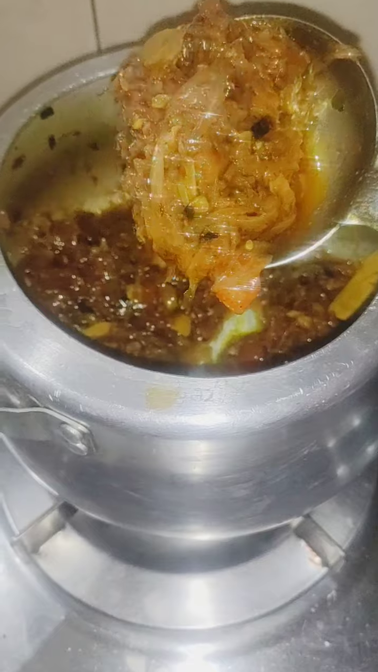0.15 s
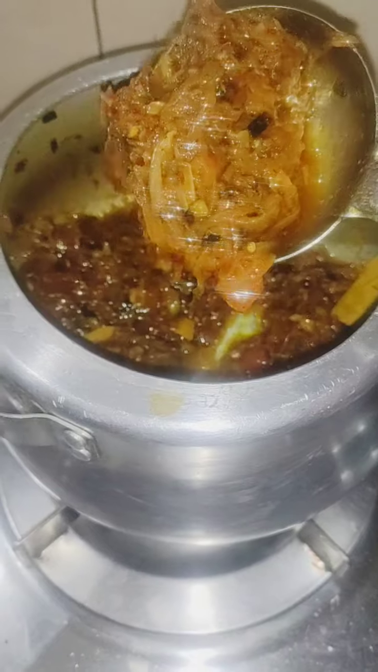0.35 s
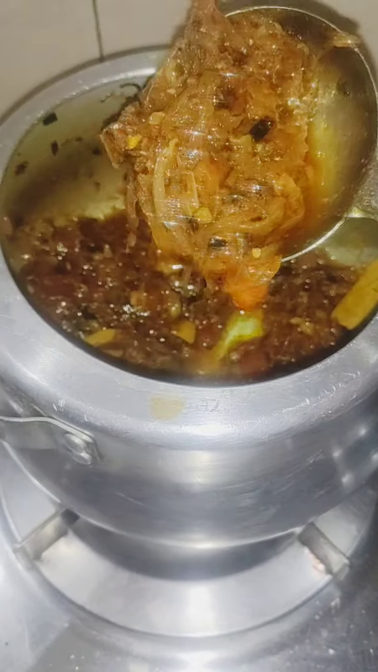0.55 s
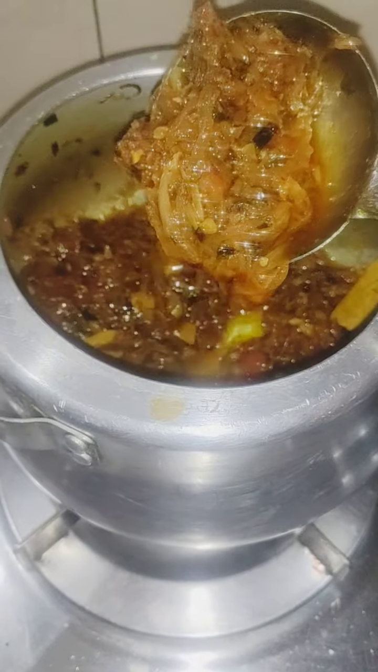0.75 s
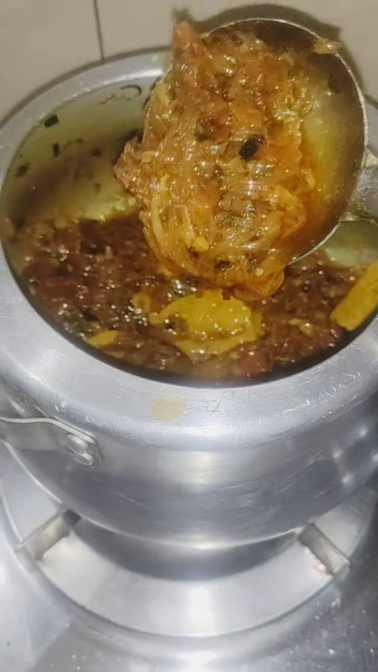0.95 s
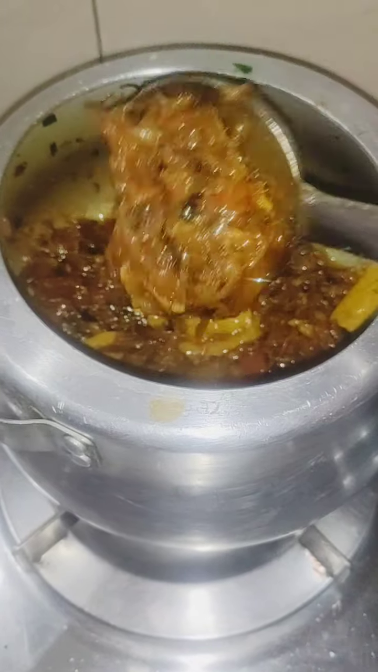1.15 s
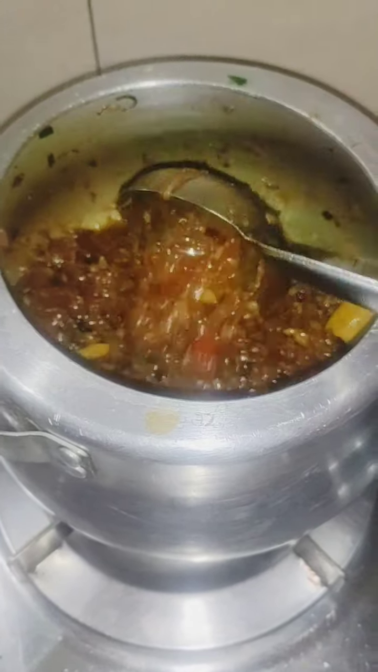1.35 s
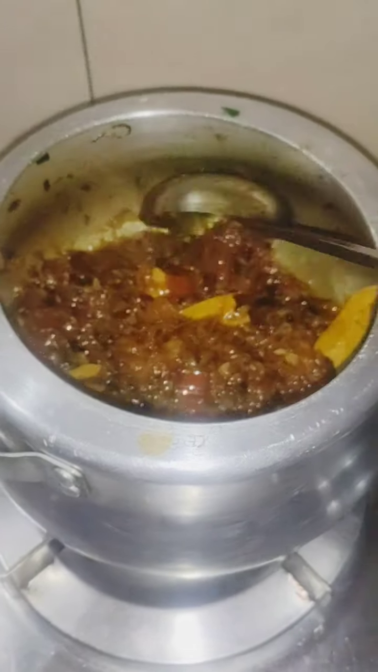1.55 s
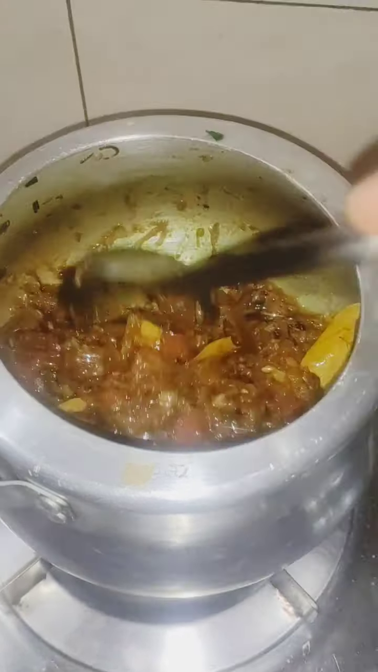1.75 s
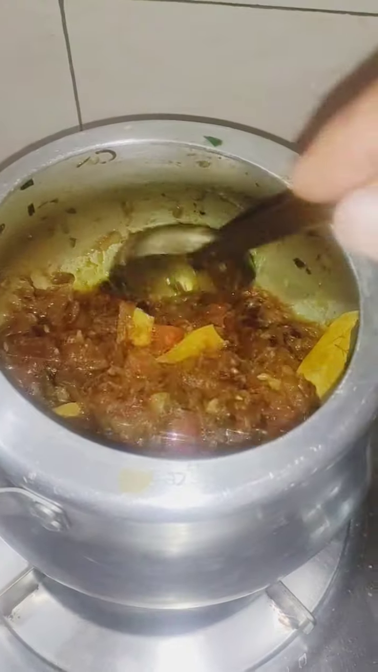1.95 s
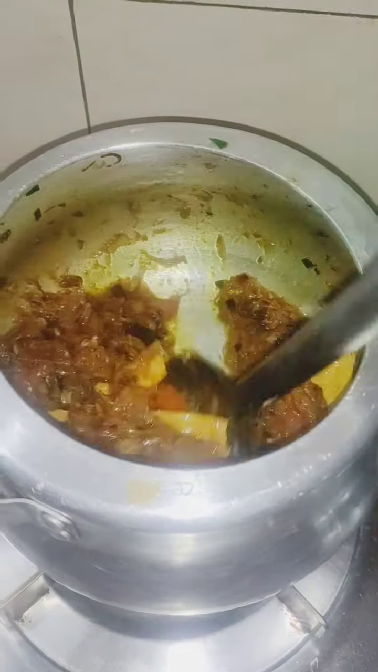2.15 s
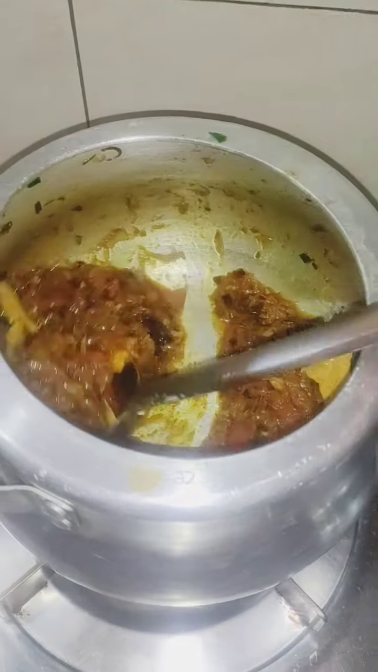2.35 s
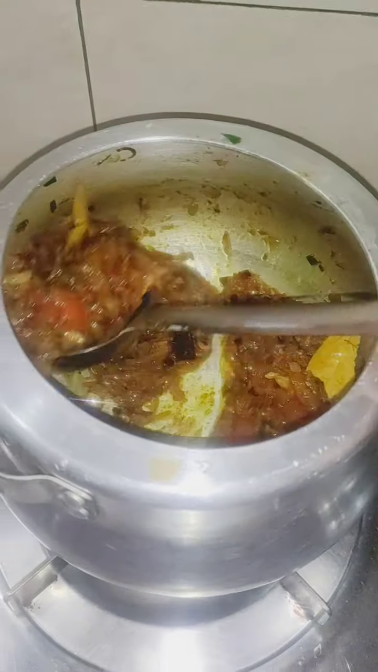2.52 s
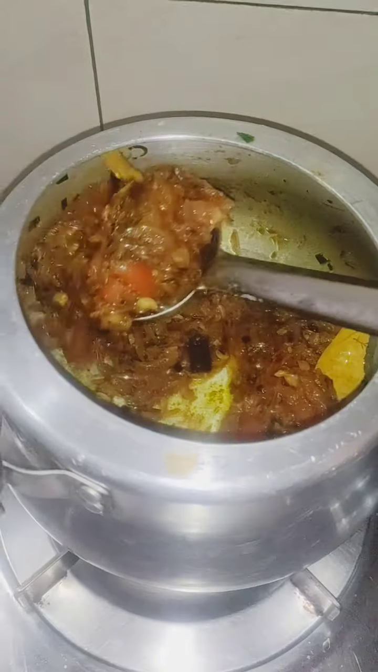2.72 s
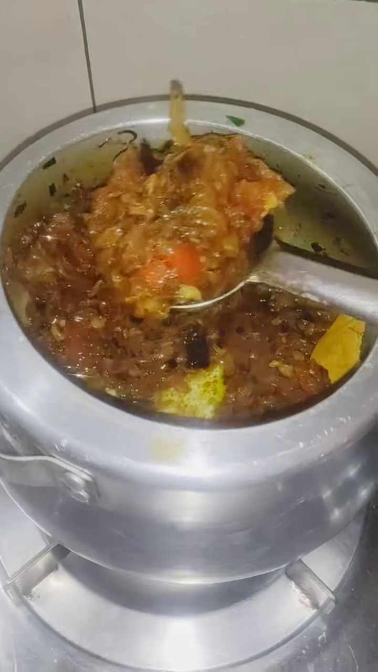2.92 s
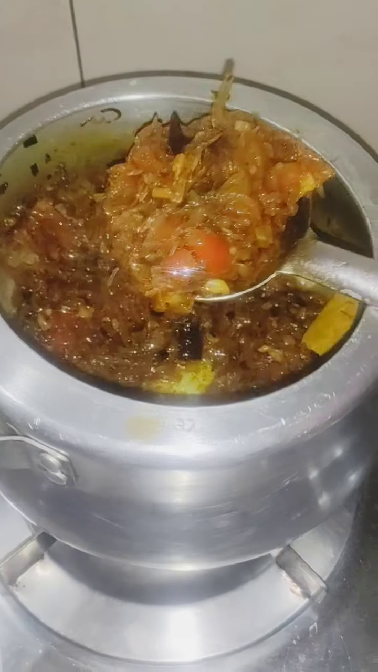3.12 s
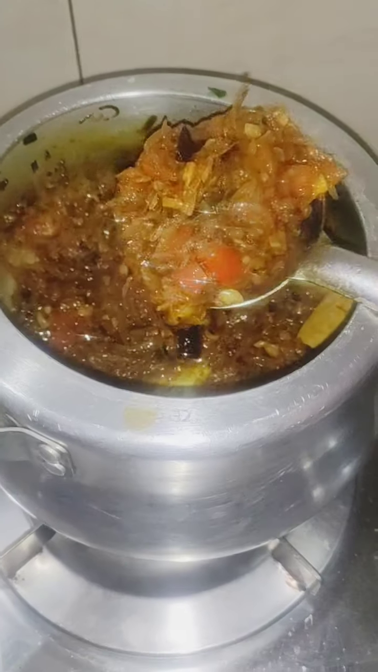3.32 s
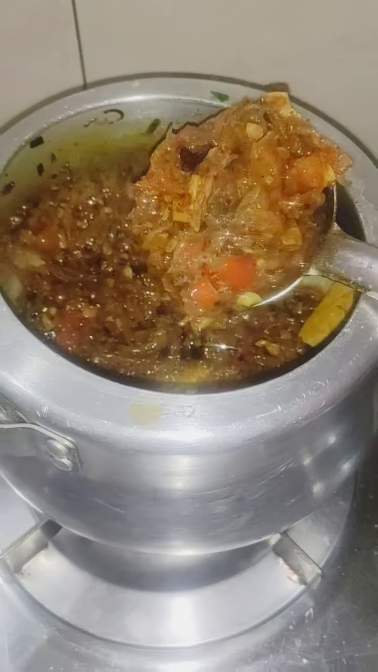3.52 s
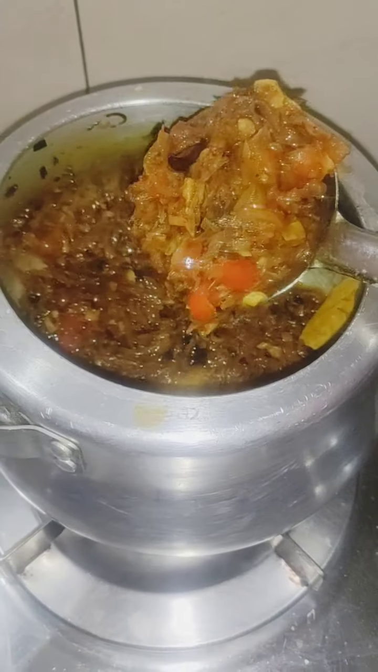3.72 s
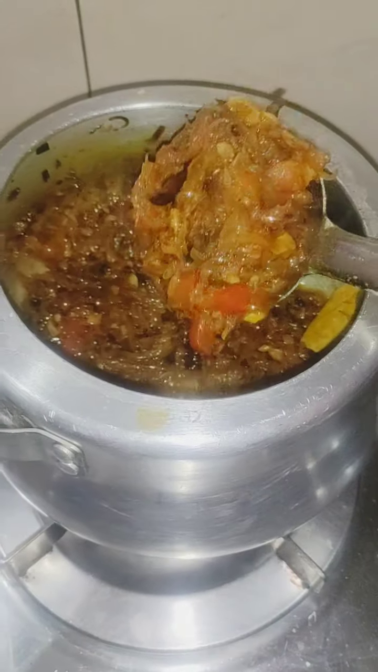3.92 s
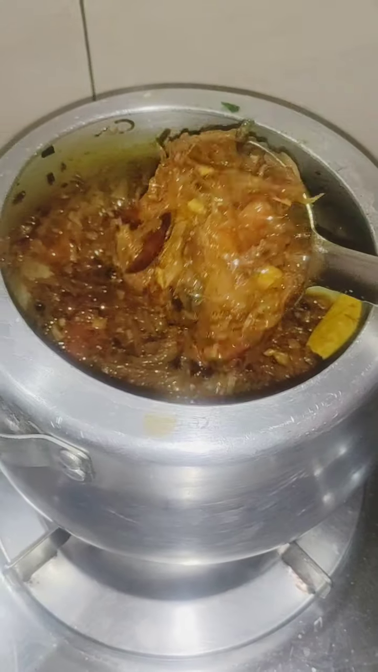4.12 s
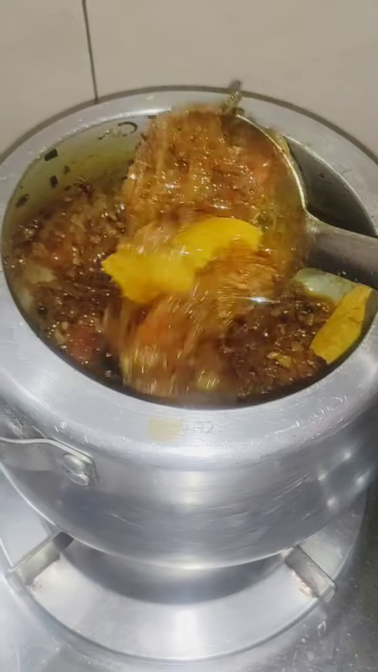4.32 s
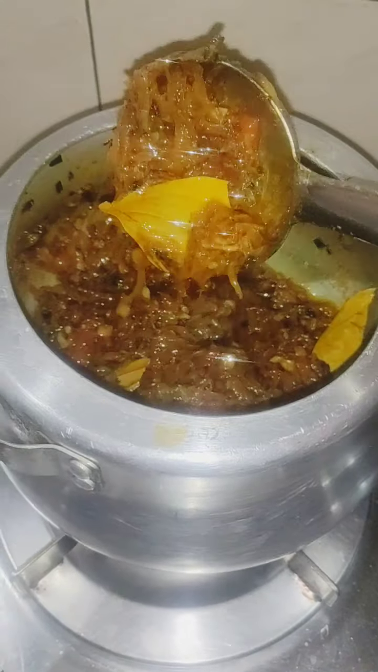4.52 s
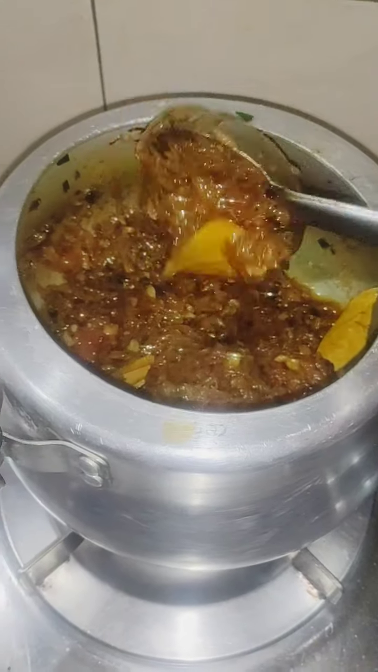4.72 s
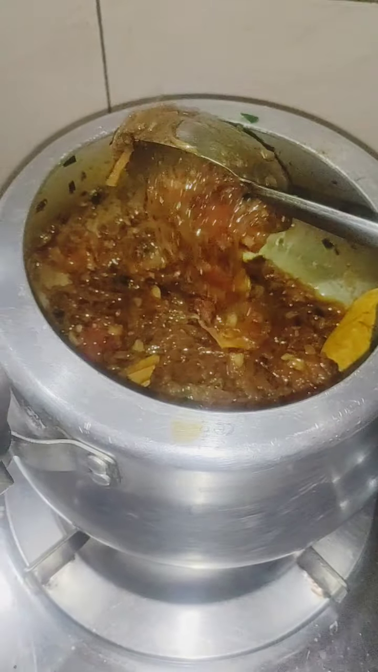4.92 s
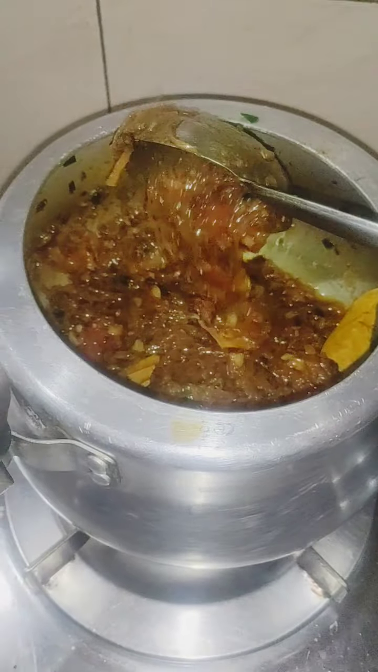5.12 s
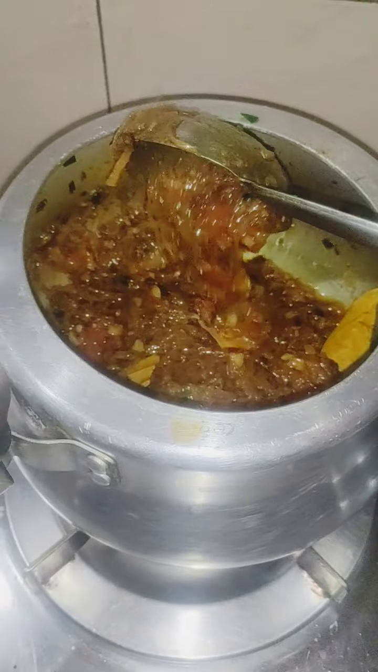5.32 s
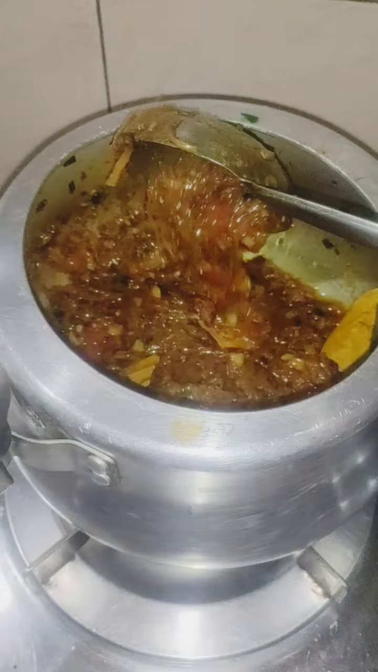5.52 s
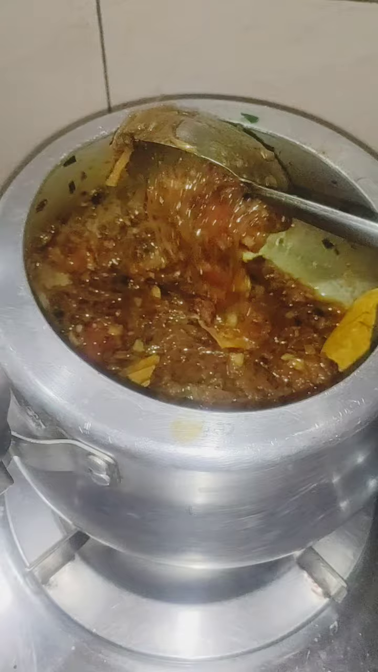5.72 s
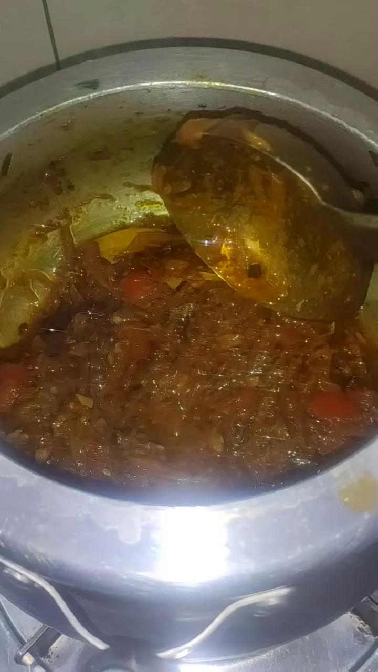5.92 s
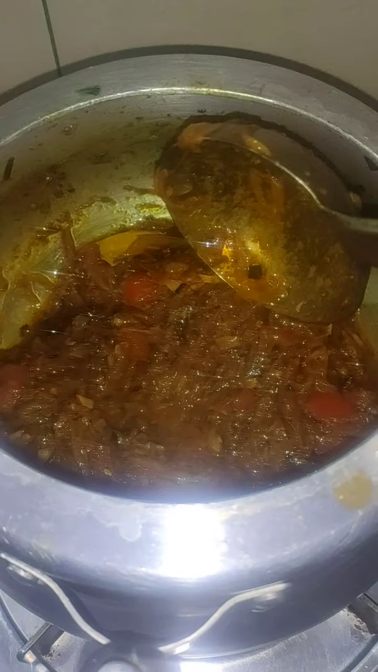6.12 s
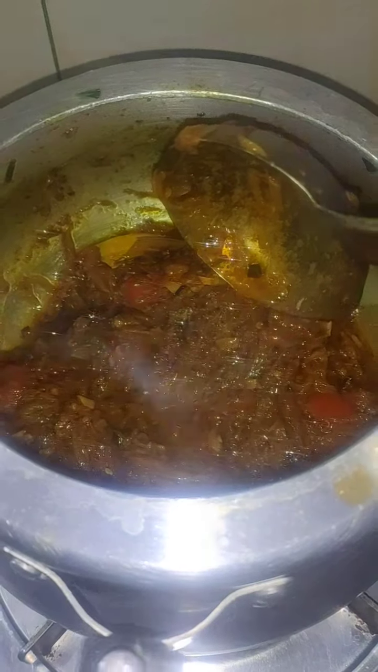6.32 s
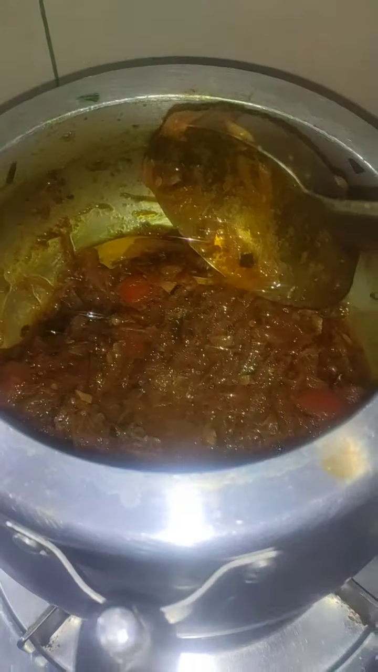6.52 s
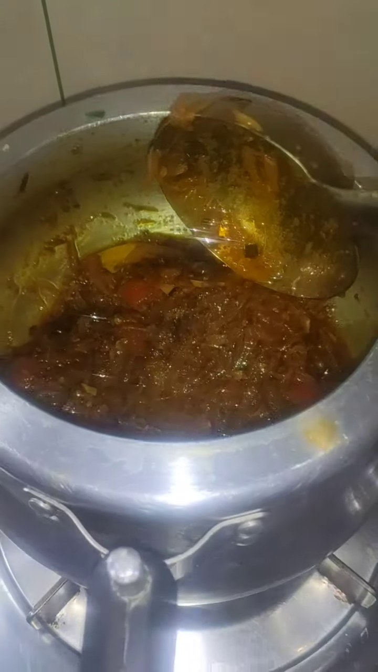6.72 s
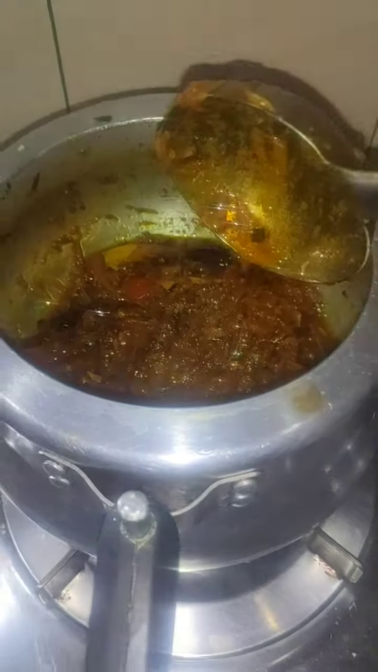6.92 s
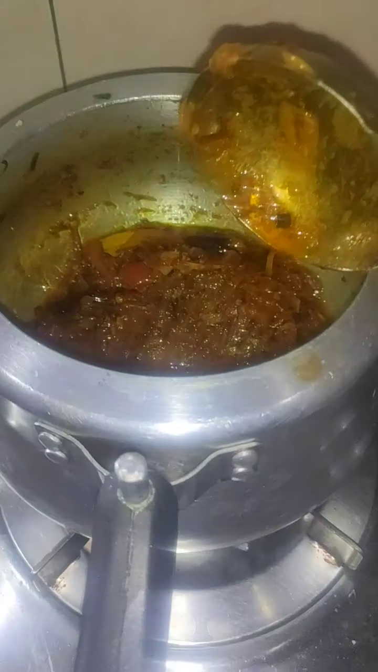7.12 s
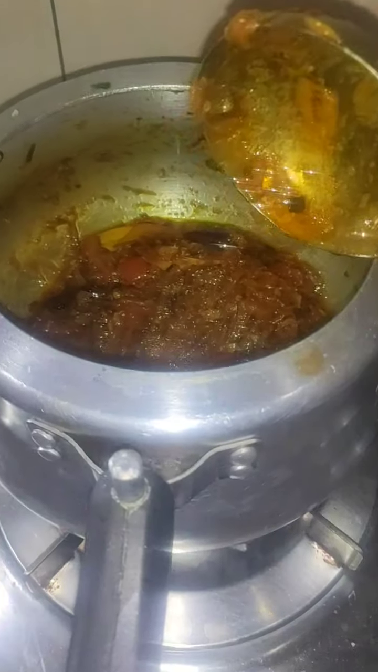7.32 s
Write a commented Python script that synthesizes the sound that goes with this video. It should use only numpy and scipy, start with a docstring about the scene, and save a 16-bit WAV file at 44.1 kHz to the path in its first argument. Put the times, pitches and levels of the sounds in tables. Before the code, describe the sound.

Heard up close in a small, slightly echoing kitchen, a steel ladle stirs thick frying sauce, with short scrapes, bright ringing clinks and dull knocks of the pot on the stove. The stirring comes in a busy run, then sparser strokes, over a soft sizzle and low hum. After a split second of silence near the end, the ladle is still and the oil pops and patters gently.

```python
"""A steel ladle stirs thick masala in an aluminium cooker, close to a microphone pair in a small tiled kitchen.
It clinks and scrapes on the wall and jolts the pot on its stand. Bubbles burst in the hot oil as a sizzle
with lone spits; behind them the gas ring and the house hum low. Near 5.8 s the sound drops out for 0.3 s,
then returns with the ladle still and the pot quieter."""
import sys
import numpy as np
from scipy import signal
from scipy.fft import rfft, irfft, next_fast_len
from scipy.io import wavfile

SR = 44100
rng = np.random.default_rng(int(sys.argv[2]) if len(sys.argv) > 2 else 0)


def put_to_file(sound):
    """Save the sound as 16-bit audio at rate SR, in the file named by the first command-line argument."""
    columns = np.atleast_2d(sound).T  # one column per channel
    safe = np.clip(columns, -1, 1)
    whole_steps = np.round(safe * 32767)
    wavfile.write(sys.argv[1], SR, whole_steps.astype(np.int16))


N = 324531
FFT_SIZE = next_fast_len(N + SR)
HZ = np.maximum(np.arange(FFT_SIZE // 2 + 1) * SR / FFT_SIZE, 1)
T = np.arange(N) / SR

# blows on the wall, a row for each pitch heard: start_s, level_db, contact_ms, pitch_hz, ring_share,
# free_of_paste_share, focus_db_per_octave_squared, left_minus_right_db
CLINKS = [(1.63, -34.5, 0.76, 5470, 0, 0.3, 17, -3), (1.631, -35.5, 13, 2850, 0.3, 0, 4, 0),
          (1.697, -21.5, 6.8, 3300, 0.77, 0.02, 20, 2), (1.726, -25.5, 7.4, 4530, 0.36, 0.5, 13, 1),
          (1.916, -50, 1.7, 8900, 0.1, 0.2, 4, -9), (1.972, -33, 1.4, 3880, 0.9, 0.08, 5, 0),
          (1.987, -31.5, 1.4, 5500, 0.5, 0.15, 12, -6), (2.034, -31, 21, 4690, 0.45, 0.27, -2, 5),
          (2.035, -43, 15, 7150, 0.1, 0.5, 26, -8), (2.091, -39.5, 3.3, 9100, .1, 0, 4, -5.5),
          (2.161, -38, 0.67, 12560, 0.3, 0, 7, 0), (2.392, -20.5, 3.8, 6950, 0.3, 0.25, 11, 4),
          (2.393, -18.5, 3.3, 8570, 0.2, 0.8, 38, 5), (2.392, -22, 7.3, 1334, 0.2, 0.3, 41, -3),
          (2.391, -23, 7.4, 4270, 0.5, 0.1, 5, -2.5), (2.475, -24.5, 44, 4360, 0.33, 0.5, 0, 2.5),
          (2.477, -29.5, 8.3, 3300, 0, 0.6, 30, -4), (2.476, -29.5, 10, 5830, 0.5, 0.5, 30, -9),
          (2.7024, -27, 1.6, 5560, 0.5, 0.15, -1, -1), (2.794, -35, 2.1, 4750, 0.7, 0.59, 6, 3),
          (2.986, -39.5, 4, 1670, 0.5, 0.5, 6, -2), (4.3917, -17, 3.4, 5220, 0.17, 0.23, 66, -1.5),
          (4.392, -36, 2.5, 2360, 0, 0.1, 22, -5), (4.392, -28, 2.3, 7850, 0, 0, 60, -3),
          (4.3913, -26.5, 3, 5950, 0.1, 0.2, 62, -5), (4.3914, -25, 2.9, 9740, 0, 0, 27, -11),
          (4.392, -39, 3.4, 3540, 0.2, 0.5, 39, 4), (4.393, -33, 2.1, 1260, 0.1, 0, 27, -6.5),
          (4.89, -36.5, 2.1, 8650, 0.9, 0, 2.5, -7), (4.898, -36.5, 3.9, 5700, 0.7, 0.05, -1.5, -2.5),
          (5.012, -48, 2.7, 5700, 0, 0, 6, -4.5), (5.369, -26, 3.3, 2270, 1, 0.62, 27, -2.5),
          (5.369, -42.5, 4.6, 1100, 1, 0.6, 21.5, 1.5), (5.368, -31.5, 2.5, 2900, 0.5, 0.16, 23.5, 14.5),
          (5.368, -26.5, 3.7, 4470, 0.48, 0.9, 87, -3), (5.368, -25, 8.1, 6500, 0.7, 0.24, 19.5, -3.5),
          (5.617, -34.5, 9.9, 4450, 0.05, 0.7, 42.5, -5), (5.666, -38, 4.9, 9100, 0.25, 0.06, 1, -3.5),
          (5.692, -31.5, 13, 7230, 0.7, 0.34, 8.5, -3.5), (5.708, -28, 4.4, 10300, 0.77, 0.52, 14.5, -5.5),
          (5.707, -32.5, 9, 6040, 0.5, 0.6, 7.5, -6.5), (5.705, -36, 10, 2240, 0.17, 0.44, 28.5, -0.5),
          (5.712, -33, 18.5, 1120, 0.9, 0.82, 15.5, -5), (5.722, -34.5, 9, 7200, 0.33, 0.54, 26.5, -5.5)]
# modes of ladle and wall: pitch_hz, level_db, t60_s
METAL_MODES = [(797, -8, .45), (1120, -6, .7), (2277, 0, .2), (2305, -7, .3), (4183, -14, .3),
               (4409, -2, 1.4), (1335, -8, .12), (2665, -8, .3), (3160, -11, .1), (4457, -11, .3),
               (4351, -13, .3), (3670, -7, .2), (5152, -9, .06), (5430, -9, .2), (5680, -8, .1),
               (5868, -6, .2), (6040, -7, .2), (6450, -10, .08), (6810, -7, .15), (7100, -4, .15),
               (7740, -10, .08), (8270, -8, .08), (8440, -7, .15), (8820, -7, .12), (9300, -10, .1),
               (10300, -6, .06), (11400, -9, .06)]
# the ladle shoves the pot: start_s, level_db, pitch_hz
JOLTS = [(1.352, -48.5, 362), (1.509, -28, 600), (1.631, -34, 573), (1.699, -21, 430), (1.976, -22.5, 643),
         (2.019, -28.5, 275), (2.211, -34.5, 408), (2.317, -31, 447), (2.446, -25, 470), (2.455, -20, 426),
         (2.476, -22.5, 940), (2.531, -39, 102), (2.986, -30, 640), (2.999, -51, 102), (3.273, -31.5, 623),
         (4.429, -39, 634), (5.367, -38, 556), (5.615, -38.5, 636), (5.72, -40.5, 900)]
# modes of pot and stand: pitch_hz, level_db, t60_s
STAND_MODES = [(102.5, 15.5, 1), (176.8, -16.5, 0.38), (257.2, 3, 0.64), (308, 3.5, 0.18), (331.7, 3, 0.47),
               (361.7, 2, 0.098), (412, -10.5, 0.11), (504.8, 5, 0.34), (564, 8.5, 0.086),
               (808, -3.5, 0.33), (707, -16, 0.3), (862, -4, 0.13), (894, -0.5, 0.37), (1028, -5.5, 0.2),
               (1269, -3, 0.035), (1438, -4, 0.073)]
# ladle strokes along the wall: peak_s, level_db, bare_metal_share, rumble_db, squeal_hz
STROKES = [(1.37, -54, 0.59, -77, 4400), (1.549, -50, 0.32, -49.5, 800), (1.737, -35, 0.27, -38, 4500),
           (2.006, -36.5, 0.28, -36.5, 3600), (2.207, -42, 0.43, -49, 4870), (2.25, -53, 0.65, -70, 4870),
           (2.275, -47.5, 0.8, -71, 10340), (2.315, -48, 0.4, -81, 5000), (2.493, -30, 0.26, -41, 4300),
           (2.75, -42.5, 0.4, -48.5, 4800), (5.419, -53, 0.94, -50, 4409), (5.628, -40.5, 0.78, -44, 4410),
           (5.68, -48.5, 0.86, -56.5, 2204), (5.728, -43, 0.56, -52, 1120), (5.754, -50.5, 0.83, -61, 3670)]
# hiss of steel through paste: frequency_hz, level_db
PASTE_HISS = [(350, -15), (600, 11), (1750, 9), (1930, 8.5), (3530, 0), (4780, -1), (6920, -6),
              (11500, -35), (16000, -19)]
# frying, before and after the dropout: time_s, sizzle_db, crackle_over_sizzle_db
FRYING_LEVELS = [
    [(0, -57, -5.5), (1.2, -57, -1), (1.38, -54.5, -4), (1.45, -58.5, -30), (1.9, -53, -23.5),
     (2.9, -51.5, -28), (3.5, -54.5, -21.5), (4.4, -54.5, -21.5), (4.8, -58.5, -26), (5.3, -58, -8),
     (5.77, -48.5, 0.5)],
    [(6.05, -64, -13.5), (7.36, -67, -11)],
]
# sizzle spectra, before and after the dropout: frequency_hz, level_db
SIZZLE_EARLY = [(530, -42), (900, -6), (1130, -11.5), (1350, -4), (1670, -9), (2030, 0.5), (3720, -5),
                (5080, -1), (7180, -4), (11000, -8), (15600, -11.5)]
SIZZLE_LATE = [(530, -46.5), (900, -19), (1700, -9.5), (2600, -8.5), (3600, -8.5), (4800, -11.5),
               (5600, -9), (6200, -3.5), (7200, -8), (8200, -11.5), (13000, -15.5), (15600, -14)]
# air and wall resonances of the pot: pitch_hz, width_hz, gain_db
POT_RESONANCES = [(1285, 32, 14), (2434, 46, 4.5), (3370, 25, 8.5), (4250, 110, 5.5), (5370, 79, -4.5),
                  (6070, 170, -1)]
# larger bubbles on the pot's bottom: pitch_hz, width_hz, rate_per_s
CRACKLE = (4800, 550, 1500)
# lone spits of oil: start_s, level_db, pitch_hz
SPITS = [(0.351, -43, 4440), (1.3074, -48, 4530), (3.4017, -52, 3450), (6.112, -54.5, 5060),
         (6.1424, -57, 2280), (6.263, -50, 2290), (6.284, -47, 3580), (6.284, -55, 4560),
         (6.3889, -58, 2330), (6.391, -55, 5900), (6.455, -56, 2320), (6.662, -54, 2310),
         (6.778, -56, 2310), (6.819, -62, 2280), (6.831, -60, 4200), (6.8744, -60, 2330),
         (6.989, -64, 2300), (7.0094, -60, 5100), (7.1485, -55.5, 4100), (7.225, -60, 4370),
         (7.2867, -57.5, 4290)]
# small spits pinging the wall: pitch_hz, t60_s, rate_per_s, level_db
PATTER = (2307, 0.12, 298, -83.5)
# hum, before and after the dropout: time_s, level_db
HUM_LEVELS = [
    [(0, -56), (1.1, -57), (1.9, -53.5), (2.6, -53.5), (3.9, -58.5), (4.5, -54.5), (5.77, -59)],
    [(6.05, -54.5), (7.36, -59)],
]
# rumble spectra, before and after the dropout: frequency_hz, level_db
HUM_EARLY = [(12, -32), (22, -0.5), (45, -10.5), (62, -2), (78, -14.5), (110, -19.5), (251, -15),
             (409, -15), (520, -9.5), (630, -13.5), (990, -22), (1500, -23), (2500, -74.5)]
HUM_LATE = [(18, -32.5), (30, -2.5), (49, -1.5), (194, -19), (240, -20), (526, -20), (620, -22),
            (1500, -31.5), (1950, -79), (3300, -120)]
# low resonances of the room: pitch_hz, width_hz, gain_db
ROOM_MODES = [(56.9, 4.0, 15), (157.7, 2.3, 14.5), (186.3, 5.3, 13.5), (342.5, 19, 8.5), (497, 28, 10.5),
              (563.5, 20, 9)]
# appliance tones: pitch_hz, level_over_rumble_db, waver_hz
APPLIANCE_TONES = [(59, -20.5, 1.9), (99, -13.5, 1), (114.8, -14.5, 0.82)]
# decay between the tiles: frequency_hz, t60_s
ROOM_DECAY = [(100, 0.64), (400, 0.81), (1500, 0.6), (5000, 0.43), (9000, 0.3), (14000, 0.49)]
# balance of the ladle and of the early and late sizzle: frequency_hz, left_minus_right_db
LADLE_PAN = [(1000, -2), (2500, 2), (6000, -3.5), (12000, -15)]
SIZZLE_PAN_EARLY = [(60, -1), (110, 2), (200, -1.5), (380, -4.5), (700, -15.5), (1290, -4), (2380, -1),
                    (4400, -0.5), (8120, -9), (15000, -14.5)]
SIZZLE_PAN_LATE = [(60, -4), (380, -5), (2380, 1.5), (15000, -5)]
# the ladle's path round the pot's wall to the left microphone: frequency_hz, phase_rad
LADLE_LEFT_PHASE = [(700, 0.53), (1120, -0.25), (1600, 0.3), (2290, 0.85), (2800, 1.9), (3400, -3),
                    (4400, 1.27), (5400, -0.75), (7000, 1.55)]
# likeness of the two microphones: frequency_hz, correlation
MIC_LIKENESS = [(60, 0.92), (130, 0.89), (290, 1), (640, 0.25), (1400, 0.076), (5000, 0.054),
                (15000, 0.075)]
# the brief silence: time_s, gain_db
DROPOUT = [(5.7668, 0), (5.768, -20), (5.776, -18), (5.782, -90), (6.053, -90), (6.057, 0)]

RESUME_S = DROPOUT[4][0]   # the sound starts to return


def clinks():
    """Steel or grit hits the wall: a bright, pitched crack and ringing metal, damped by paste."""
    out = np.zeros((2, N))
    for start_s, db, ms, hz, ring_share, free, focus, pan_db in CLINKS:
        touch = np.diff(contact(ms, rng.standard_normal(SR // 3)))
        focus = max(focus, 0)   # a focused blow keeps near its pitch and lasts more cycles
        blow = ring(touch, hz, (1 + focus / 8) / hz)
        snap = peak_one(ring(blow, hz, (5.2 + 0.82 * focus) / hz))
        tone = peak_one(ring(blow, hz, 200 * free / hz))
        metal = struck(touch, METAL_MODES, hz, focus, free)
        sound = ring_share * metal + (1 - ring_share) * peak_one(snap + tone)
        add(out, start_s, sound, [db + pan_db / 2, db - pan_db / 2])
    return out


def jolts(contact_ms=5.1, rocking_ms=53, rise_s=0.0025):
    """A shove cushioned by paste thuds and rocks the pot; the deeper it is, the more the stand rings."""
    out = np.zeros(N)
    for start_s, db, hz in JOLTS:
        noise = rng.standard_normal(SR * 2 // 3)
        touch = contact(contact_ms, noise) + 0.22 * contact(rocking_ms, noise)
        touch *= np.minimum(T[:len(touch)] / rise_s, 1)
        low_hz = min(max(hz / 2.1, 200), hz * 0.85)
        thud = bandpass(touch, low_hz, hz * 1.5, order=4)
        stand = struck(thud, STAND_MODES, hz, focus_db=1.2, t60_scale=0.97)
        ring_gain = 0.55 * amp(-3.5 * np.log2(hz / 500))
        add(out, start_s, ring_gain * stand + peak_one(thud), db)
    return out


def scrapes(press_db_per_s=258.5, ease_db_per_s=154.5, deep_hz=400, squeal_cycles=95):
    """The ladle sticks and slips: hiss in paste, grit, squeal and ring on bare wall, rumble in the stand."""
    peak_s, db, bare, rumble_db, squeal_hz = np.array(STROKES).T
    since = T - peak_s[:, None]
    strokes = amp(np.where(since < 0, press_db_per_s, -ease_db_per_s) * since)
    on_paste = (amp(db) * (1 - bare)) @ strokes
    on_metal = (amp(db) * bare * (1 - bare ** 3)) @ strokes
    on_clean_wall = (amp(db) * bare ** 3) @ strokes
    on_stand = amp(rumble_db) @ strokes
    on_deep = (amp(rumble_db) * (1 - bare)) @ strokes   # deep modes need the weight of paste
    slips = rms_one(grains(6000 * amp(3.5 * drift(31)), 2.8))
    hiss = rms_one(coloured(slips, amp(at_hz(PASTE_HISS))))
    grit = rms_one(ring(ring(np.diff(slips, prepend=0), 5200, 0.0009), 9100, 0.0004))
    ringing = sum(amp(mode_db) * ring(slips * on_clean_wall, hz, 0.7 * t60)   # rubbing shortens the ring
                  for hz, mode_db, t60 in METAL_MODES)
    rumble = squeal = 0
    for hz, mode_db, t60 in STAND_MODES[2:]:
        drive = on_deep if hz < deep_hz else on_stand
        rumble += drive * amp(mode_db - 13) * rms_one(ring(slips, hz, 1.2 * t60))
    for stroke, gain, hz, share in zip(strokes, amp(db - 3), squeal_hz, bare):
        t60 = squeal_cycles * share ** 2 / hz   # paste blurs the pitch
        squeal += gain * share * stroke * rms_one(ring(slips, hz, t60))
    return on_paste * hiss + 0.5 * on_metal * grit + rumble + squeal + amp(-29) * ringing


def ladle():
    """Clinks, jolts and scrapes with the room behind them, bent round the pot to the left microphone."""
    thuds, blows, drag = jolts(), clinks(), scrapes()
    dull_blows = coloured(blows.mean(0), 1 / (1 + (HZ / 9000) ** 2))
    echoes = kitchen(amp(-1.5) * thuds + amp(-3.5) * dull_blows + amp(-4.5) * drag)
    sound = (amp(-2) * thuds + drag + echoes) * pan(-0.26)[:, None] + blows
    left_turn = np.exp(1j * np.outer([1, 0], at_hz(LADLE_LEFT_PHASE)))
    return coloured(sound, pan(at_hz(LADLE_PAN)) * left_turn)


def sizzle(bursts_per_s=9000, flicker_db=0.9, top_hz=15750):
    """Tiny bubbles burst in the oil and sound through the pot; larger ones crackle in clumps."""
    sizzle_db, crackle_db = in_time(FRYING_LEVELS)
    pot = resonances(POT_RESONANCES)
    bursts = pair(*[grains(bursts_per_s * amp(2.8 * drift(25)), 2.5) for _ in range(2)])
    early = rms_one(coloured(bursts, amp(at_hz(SIZZLE_EARLY)) * pot * pan(at_hz(SIZZLE_PAN_EARLY))))
    late = rms_one(coloured(bursts, amp(at_hz(SIZZLE_LATE)) * pan(at_hz(SIZZLE_PAN_LATE))))
    hz, width_hz, per_s = CRACKLE
    pops = pair(*[grains(per_s * amp(1.4 * drift(21)), 3.4) for _ in range(2)])
    bubbles = ring(np.diff(pops, prepend=0), hz, 1.1 / width_hz)
    crackle = amp(crackle_db) * rms_one(coloured(bubbles, pot)) * pan(-2.5)[:, None]
    level = amp(sizzle_db + flicker_db * drift(21))
    return coloured(level * (np.where(T < RESUME_S, early, late) + crackle), HZ < top_hz)


def spits():
    """Oil pops, dry unless near the wall's pitch; after the dropout small spits patter on the wall."""
    out = np.zeros(N)
    wall_hz, t60, per_s, patter_db = PATTER
    for start_s, db, hz in SPITS:
        touch = contact(1.8, rng.standard_normal(SR // 10))
        cycles = 24 + 176 * np.exp(-((hz - wall_hz) / 390) ** 2)
        tick = peak_one(np.diff(touch, prepend=0))
        add(out, start_s, peak_one(ring(touch, hz, cycles / hz)) + 0.12 * tick, db)
    patter = grains(per_s, 1.9) * (T > RESUME_S)
    return out + amp(patter_db) * ring(patter, wall_hz, t60)


def hum():
    """Burner and house rumble in the room's low resonances, with wavering appliance tones."""
    noise = pair(*rng.standard_normal((2, N)))
    early, late = [rms_one(coloured(noise, amp(at_hz(spectrum)) * resonances(ROOM_MODES)))
                   for spectrum in (HUM_EARLY, HUM_LATE)]
    tones = 0
    for hz, db, waver_hz in APPLIANCE_TONES:
        level = amp(db + 4.1 * drift(4.3))
        tones += level * np.sin(2 * np.pi * np.cumsum(hz + waver_hz * drift(4.4)) / SR)
    rumble = np.where(T < RESUME_S, early, late)
    return amp(in_time(HUM_LEVELS)[0]) * (rumble + tones) * pan(-3.5)[:, None]


def kitchen(x, onset_s=0.0011):
    """Tiles return a dense tail of echoes, each octave dying at its own rate."""
    t, edges_hz = T[:SR], 60 * 2. ** np.arange(9)
    echoes = pair(*rng.standard_normal((2, N)))[:, :SR]
    tail = sum(bandpass(echoes, low, high, order=2) * amp(-60 * t / at_hz(ROOM_DECAY, np.sqrt(low * high)))
               for low, high in zip(edges_hz, edges_hz[1:]))
    tail *= np.minimum(t / onset_s, 1)
    tail /= np.sqrt(np.sum(tail ** 2) / 2)
    return coloured(x, rfft(tail, FFT_SIZE))


def contact(ms, noise):
    """A chatter of touches that dies away over the contact time."""
    return noise * np.exp(-T[:len(noise)] / (ms / 1000))


def struck(touch, modes, pitch_hz, focus_db, t60_scale):
    """Modes ring more weakly the further they lie from the blow's pitch."""
    sound = 0
    for hz, db, t60 in modes:
        gain = amp(db - focus_db * np.log2(hz / pitch_hz) ** 2 + rng.normal(0, 1))
        sound += gain * peak_one(ring(touch, hz, t60 * t60_scale))
    return peak_one(sound)


def ring(clicks, hz, t60):
    """Each click sets a decaying sine ringing."""
    decay, step = amp(-60 / (max(t60, 0.001) * SR)), 2 * np.pi * hz / SR
    return signal.lfilter([0, np.sin(step)], [1, -2 * decay * np.cos(step), decay ** 2], clicks + 1e-18)


def grains(per_s, spread_db):
    """Random clicks, a few much larger than the rest."""
    sizes = amp(spread_db * np.minimum(rng.exponential(1, N), 6)) * rng.choice([-1, 1], N)
    return sizes * (rng.random(N) < per_s / SR)


def drift(rate_hz):
    """A slow random wander of rms 1."""
    return rms_one(coloured(rng.standard_normal(N), 1 / (1 + (HZ / rate_hz) ** 2)))


def pair(mid, side):
    """Two channels, alike in the bass and less so in the treble."""
    alike = at_hz(MIC_LIKENESS)
    mid, side = coloured(mid, np.sqrt((1 + alike) / 2)), coloured(side, np.sqrt((1 - alike) / 2))
    return np.array([mid + side, mid - side])


def pan(db):
    """Left and right gains, the left higher by db."""
    return np.array([amp(db / 2), amp(-db / 2)])


def resonances(modes):
    """Gain of a flat path plus parallel resonances."""
    return np.sqrt(1 + sum(amp(2 * db) / (1 + (2 * (HZ - hz) / width) ** 2) for hz, width, db in modes))


def coloured(x, gain):
    """Filtered by a gain for every frequency."""
    return irfft(rfft(x, FFT_SIZE) * gain, FFT_SIZE)[..., :N]


def bandpass(x, low_hz, high_hz, order):
    """The band between two frequencies."""
    return signal.sosfilt(signal.butter(order, [low_hz, high_hz], "band", fs=SR, output="sos"), x)


def at_hz(points, hz=HZ):
    """A spectrum table read on a log-frequency axis."""
    frequencies, values = np.array(points).T
    return np.interp(np.log(hz), np.log(frequencies), values)


def in_time(tables):
    """Time tables joined end to end, one curve per value column."""
    time_s, *columns = np.vstack(tables).T
    return [np.interp(T, time_s, column) for column in columns]


def add(out, start_s, sound, peak_db):
    """Lays a short sound into out at the given peak."""
    at = round(start_s * SR)
    out[..., at:at + len(sound)] += np.multiply.outer(amp(peak_db), peak_one(sound))[..., :N - at]


def amp(db):
    """Gain of a level in dB."""
    return 10 ** (np.asarray(db) / 20)


def rms_one(x):
    """Scaled to rms 1."""
    return x / np.sqrt(np.mean(x ** 2) + 1e-20)


def peak_one(x):
    """Scaled to peak 1."""
    return x / np.abs(x).max()


def scene():
    """The ladle up front until the dropout, frying a little to the right, the hum behind."""
    return ladle() * (T < RESUME_S) + spits() * pan(-7.5)[:, None] + sizzle() + hum()


def record(dry, left_lag_samples=8, recovery_s=0.3, settle_s=0.15, cutoff_hz=17100):
    """Two microphones a little apart, top cut; after the dropout the level creeps back up."""
    lag = np.exp(-2j * np.pi * HZ * left_lag_samples / SR)
    heard = coloured(dry, np.array([lag, np.ones_like(lag)]))
    since_s = np.maximum(T - RESUME_S, 0)
    recovery_db = -8.5 * (T > RESUME_S) * np.exp(-since_s / recovery_s)
    heard *= amp(in_time([DROPOUT])[0] + recovery_db)
    # as the sound returns, the right channel's offset swings and settles
    progress = since_s / settle_s
    swing = amp(-32) * progress * np.exp(1 - progress) * np.cos(progress / 2.4)
    wander = amp(-51.5) * np.minimum(progress, 1) * drift(2.7)
    heard[1] += swing + wander
    return signal.sosfilt(signal.cheby2(12, 70, cutoff_hz, fs=SR, output="sos"), heard)


dry = scene()
out = record(dry)
put_to_file(out)
```